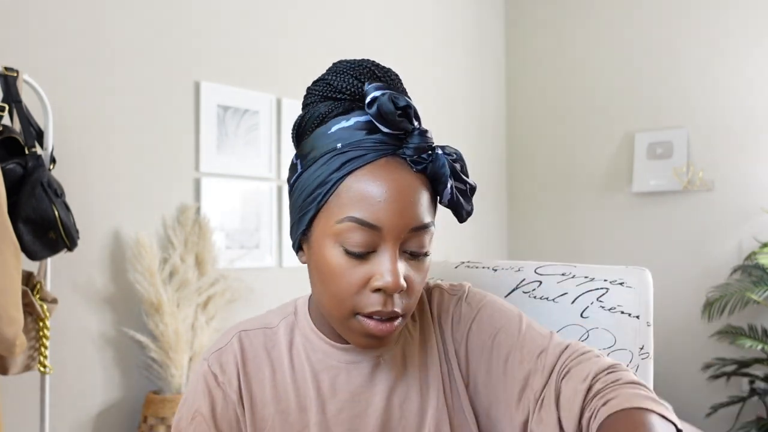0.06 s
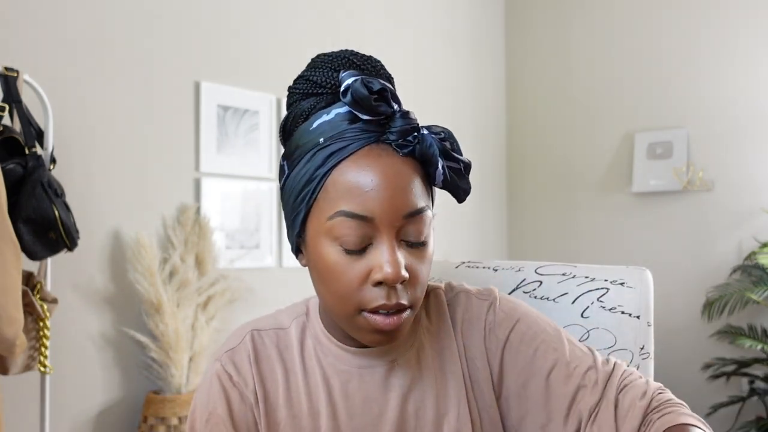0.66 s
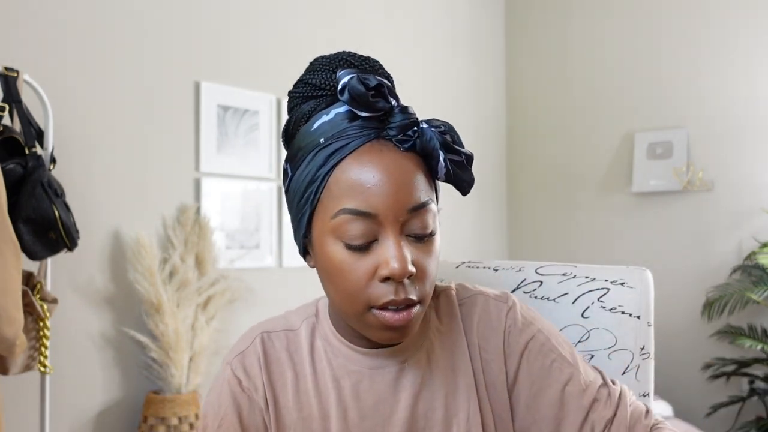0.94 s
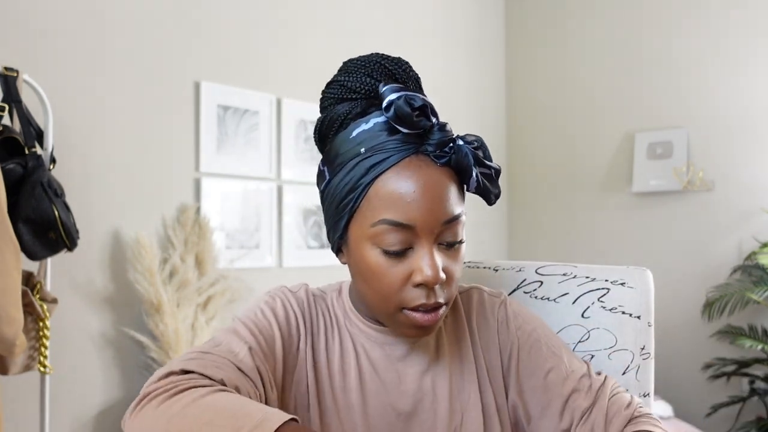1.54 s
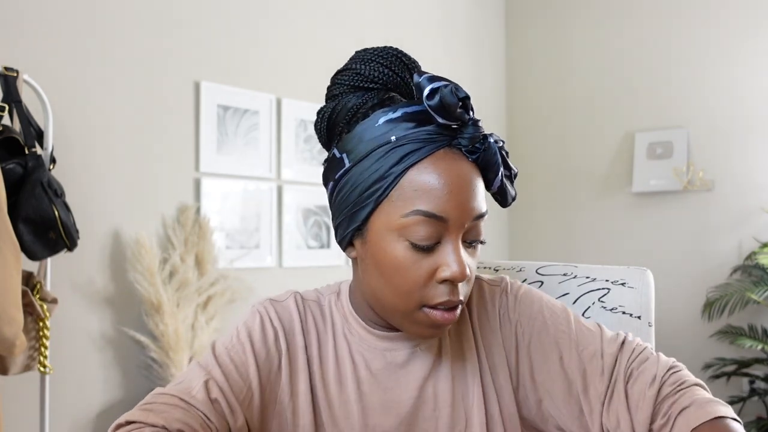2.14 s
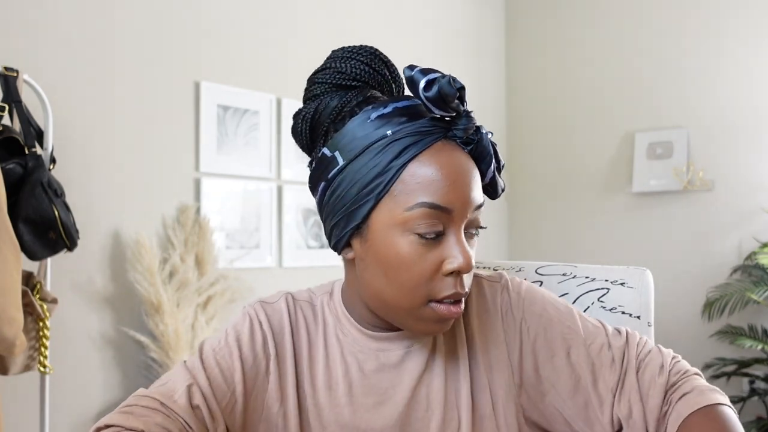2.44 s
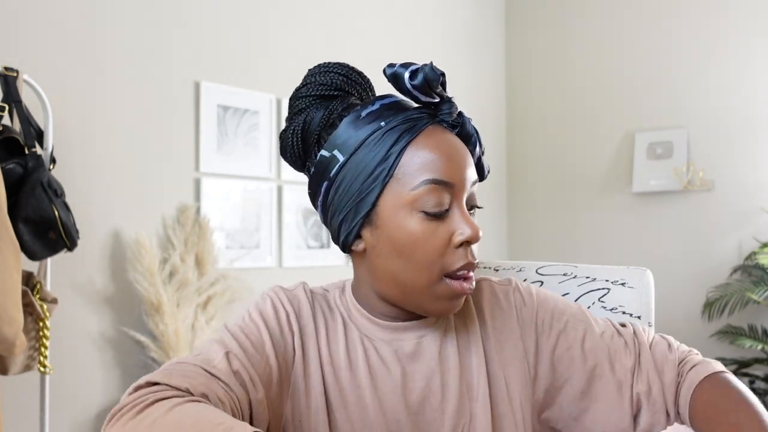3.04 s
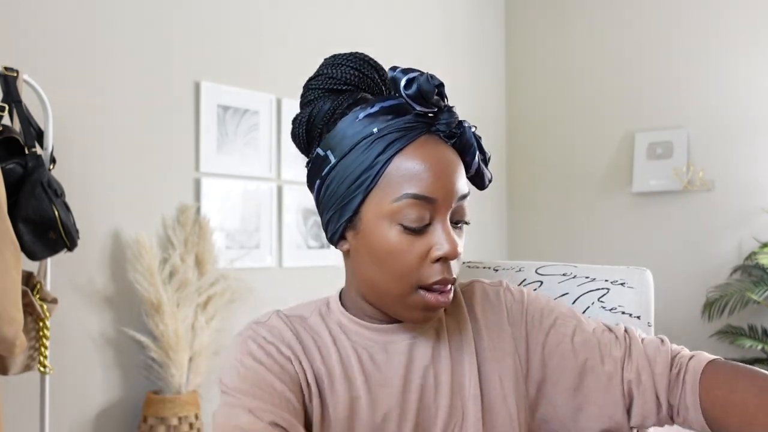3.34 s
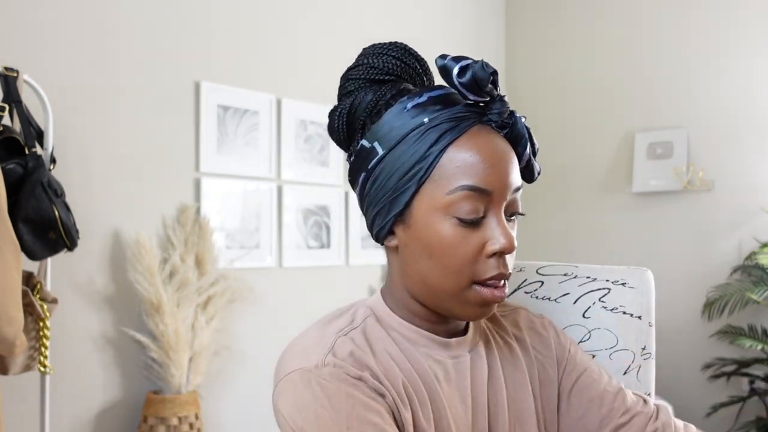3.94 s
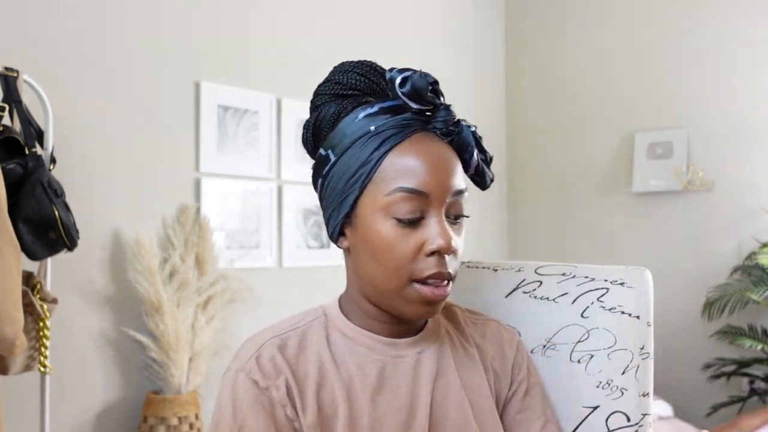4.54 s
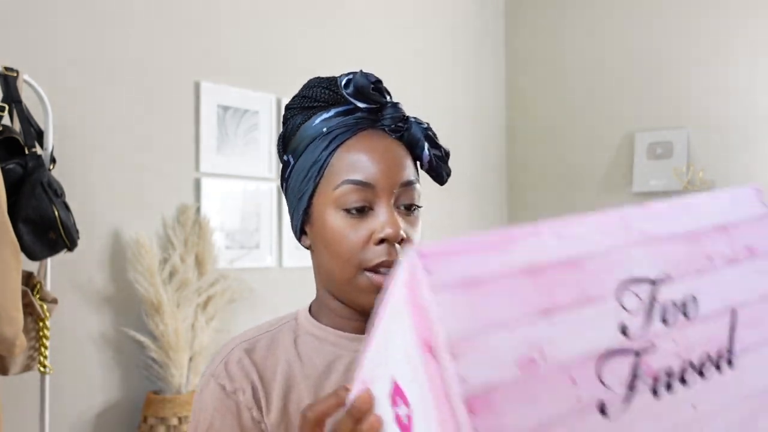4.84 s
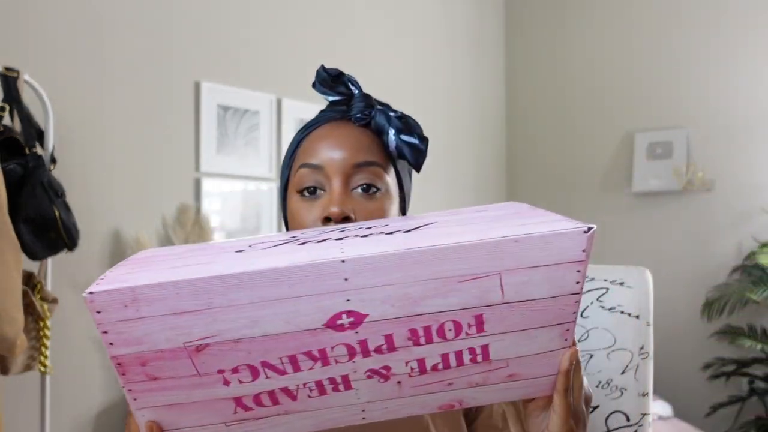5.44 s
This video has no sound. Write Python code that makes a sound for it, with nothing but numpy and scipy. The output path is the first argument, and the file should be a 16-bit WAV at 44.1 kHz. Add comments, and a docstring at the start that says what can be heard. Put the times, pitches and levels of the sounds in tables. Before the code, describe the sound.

A large cardboard package is opened at a desk in a small room, heard from close by. Hands and sleeves swish softly over the card while flaps give scattered light knocks. The box inside is then dragged free in short, scraping pulls, peaking in a loud, hollow judder with thumps. One more bump follows, then a few faint touches as it is lifted. A low room rumble lies underneath.

```python
"""A large cardboard package is opened at a desk in a small room, heard from close by.
First hands and sleeves brush the card with a swish of friction, and flaps knock, ringing its resonances.
From 2.3 s the box inside is dragged free in short pulls, and stick-slip motion drives a hollow judder,
loudest near 4 s. The box is bumped once more at 4.4 s and lifted, with a few last faint touches.
Throughout, the room reverberates and a low rumble lies under it all."""
import sys
import numpy as np
from scipy import signal
from scipy.fft import rfft, irfft, next_fast_len
from scipy.io import wavfile
from scipy.ndimage import uniform_filter1d, map_coordinates

SR = 44100
rng = np.random.default_rng(int(sys.argv[2]) if len(sys.argv) > 2 else 0)


def wav_record(signal):
    """Record a signal, one row per channel, as 16-bit PCM in the file named by sys.argv[1]."""
    frames = np.transpose(np.atleast_2d(signal))
    bounded = np.clip(frames, -1, 1)
    # unit amplitude maps onto the largest positive 16-bit level
    quanta = np.round(bounded * 32767).astype(np.int16)
    wavfile.write(sys.argv[1], SR, quanta)


N = 246462
TIME = np.arange(N) / SR


def amp(db):
    """The decibel scale: 20 dB is a tenfold amplitude."""
    return 10 ** (np.asarray(db) / 20)

def unit(x):
    """Power normalisation: scale to rms 1."""
    return x / np.sqrt(np.mean(x ** 2) + 1e-20)

def burst(x, size=256):
    """Short-time normalisation: the loudest few milliseconds have rms 1."""
    return x / np.sqrt(np.abs(uniform_filter1d(x ** 2, size)).max() + 1e-20)

def along(points, hz):
    """Interpolation of (frequency, value) points on a logarithmic frequency axis."""
    frequencies, values = np.transpose(points)
    return np.interp(np.log(hz + 1), np.log(frequencies + 1), values)

def envelope(points):
    """Interpolation of (time, level) points in decibels, giving one gain per sample."""
    return amp(np.interp(TIME, *np.transpose(points)))

def wobble(rate):
    """Random modulation: a smooth curve through rate knots a second."""
    return map_coordinates(rng.standard_normal(int(N * rate / SR) + 4), [TIME * rate])

def filtered(x, response):
    """Linear filtering: the spectrum of x is multiplied by a frequency response."""
    n = x.shape[-1]
    size = next_fast_len(n + 8192)
    return irfft(rfft(x, size) * response(np.fft.rfftfreq(size, 1 / SR)), size)[..., :n]

def equalised(x, spectrum):
    """Zero-phase filtering by (frequency, level) points."""
    return filtered(x, lambda hz: amp(along(spectrum, hz)))

def coloured(x, spectrum, size=2048):
    """Minimum-phase filtering: a folded cepstrum gives the causal filter with this spectrum."""
    cepstrum = irfft(np.log(amp(along(spectrum, np.fft.rfftfreq(size, 1 / SR)))))
    cepstrum[1:size // 2] *= 2
    cepstrum[size // 2 + 1:] = 0
    return signal.fftconvolve(x, irfft(np.exp(rfft(cepstrum))))[:len(x)]

def resonate(x, modes, skirt=2.27):
    """Modal superposition: damped resonances add with alternating sign, dark below and above them."""
    def response(hz):
        return sum((-1) ** k * amp(db) * 1j * hz * width / (centre ** 2 - hz ** 2 + 1j * hz * width)
                   for k, (centre, width, db) in enumerate(modes))
    band = signal.butter(2, [modes[0][0] / skirt, modes[-1][0] * skirt], 'band', fs=SR, output='sos')
    return signal.sosfilt(band, filtered(x, response))


def contact(t, t60, snap):
    """Impact excitation: a sudden push, then an exponentially dying chatter of card on card."""
    force = rng.standard_normal(len(t)) * amp(-60 * t / t60)
    force[0] += snap
    return force

# modes of the box's walls, its hollow and its stiff board: (frequency [Hz], bandwidth [Hz], level [dB])
WALL_MODES = [(102, 36, -10), (137.1, 22.6, -2.5), (182.6, 12.5, -1.5), (242, 40, -5)]
CAVITY_MODES = [(327.6, 30.6, 0), (395.5, 58, -1.5), (497, 143, -3.5), (656, 226, -5)]
BOARD_MODES = [(700, 92, -7.5), (854, 133, -2), (1108, 95, 0), (1230, 133, -1), (1433, 157, -1),
               (1786, 280, -4.5), (2520, 470, -9.5)]
# spectrum of the surface tick: (frequency [Hz], level [dB])
TICK_SPECTRUM = [(700, -44), (1800, -7), (2800, 7.5), (4200, 2), (6200, -3.5), (7500, -13), (10000, -8.5),
                 (15500, -32)]

def strike(hz, thump_db, hollow_db, clack_db, hardness, chatter, panel_t60=0.068, rise_s=0.00062):
    """Free vibration: one impact flexes a panel, rings the hollow and board, and ticks at the surface."""
    t = np.arange(SR // 3) / SR
    flex = np.sin(2 * np.pi * hz * t) * amp(-60 * t / panel_t60) * (1 - np.exp(-t / rise_s))
    # a panel radiates little below its own pitch
    flex = signal.sosfilt(signal.butter(3, 0.68 * hz, 'high', fs=SR, output='sos'), flex)
    walls = burst(resonate(contact(t, t60=0.0077, snap=4.3), WALL_MODES))
    thump = amp(thump_db - 1.5) * burst(burst(flex) + 0.41 * walls)
    cavity = resonate(contact(t, t60=0.72 * chatter, snap=6.8), CAVITY_MODES)
    hollow = amp(hollow_db - 6.5) * burst(cavity)
    # a blunt contact cannot reach the board's upper resonances, and hardly ticks
    reach_hz = min(1170 * 2 ** (2.77 * hardness), SR / 4)
    blunt = signal.butter(3, reach_hz, fs=SR, output='sos')
    board = resonate(contact(t, t60=chatter, snap=6), BOARD_MODES)
    clack = amp(clack_db - 6) * burst(signal.sosfilt(blunt, board))
    tick_db = clack_db - 32.5 + 35 * hardness
    tick = amp(tick_db) * burst(coloured(contact(t, t60=1.07 * chatter, snap=4), TICK_SPECTRUM))
    return thump + hollow + clack + tick

# edges and flaps striking the card, levels before each part's trim: (time [s], clack level [dB],
# panel pitch [Hz], thump re clack [dB], hollow re clack [dB], hardness [0-1], board chatter t60 [s])
FLAP_KNOCKS = [ (0.115, -38, 291, 1.5, 1, 0.48, 0.044), (0.406, -43, 320, -1, 5, 0.34, 0.12),
               (0.640, -32, 215, 11, -28, 0.25, 0.02), (1.122, -28, 380, -9, -3, 0.72, 0.12),
               (1.905, -48, 159, -12, 4.5, 0.82, 0.019), (2.019, -33.5, 232, 0, 1, 0.48, 0.034),
               (2.280, -43.5, 148, 2, 1.5, 0.64, 0.046), (2.329, -33, 225, 0, -14, 0.31, 0.067),
               (2.436, -33.5, 250, -4, 0, 0.15, 0.069), (2.48, -24, 142, -5.5, -27, 0.42, 0.013),
               (2.568, -28, 136, -9, -18, 0.24, 0.061), (2.615, -38.5, 170, 2, 8.5, .4, 0.055),
               (2.637, -30.5, 266, -4, -5.5, 0.69, 0.036), (3.110, -33, 344, 6, 1.5, .3, 0.037),
               (3.250, -22, 154, -1.5, 4.5, 0.37, 0.019), (3.621, -28, 356, -4.5, -7, 0.75, .033),
               (3.684, -31.5, 140, -2, -4, 0.69, 0.017), (3.755, -24, 192, 0, 4, 0.063, 0.036),
               (3.899, -26.5, 232, 5.5, -4, 0.5, 0.051), (3.922, -13, 168, 0, -7, 0.24, 0.0082),
               (3.942, -22, 254, 6, 3.5, 0.67, 0.091), (4.121, -40.5, 143, 8.5, 11, .2, 0.036),
               (4.379, -38, 190, 6, 15, .35, 0.028), (4.395, -23, 185, 3.5, 3.5, .3, 0.1),
               (4.408, -24.5, 161, 3.5, 4, 0.66, 0.072), (4.949, -51.5, 352, -15, 11, 0.36, .076),
               (5.153, -46, 266, -6, -1.5, 1, 0.0073), (5.287, -57.5, 354, 5, 19.5, 0.43, 0.044), ]
# dull bumps on the flat of a panel: (time [s], thump level before trim [dB], panel pitch [Hz])
PANEL_BUMPS = [(0.741, -30.5, 339), (0.775, -43, 338), (1.459, -33.5, 130), (1.496, -33, 135),
               (2.153, -31.5, 143.5), (3.270, -29.5, 294), (3.469, -32, 346), (3.604, -29.5, 143),
               (3.909, -14.5, 148), (3.954, -6.5, 154), (4.006, -12.5, 169), (4.027, -12.5, 149),
               (4.088, -26, 148), (4.350, -21, 211)]

def knocks():
    """Superposition of impacts: sharp knocks and dull bumps excite the modes of the same box."""
    hits = [(start, strike(hz, db + thump, db + hollow, db, hardness, chatter))
            for start, db, hz, thump, hollow, hardness, chatter in FLAP_KNOCKS]
    hits += [(start, strike(hz, db, hollow_db=db - 19, clack_db=db - 25, hardness=0.54, chatter=0.056))
             for start, db, hz in PANEL_BUMPS]
    out = np.zeros(N + SR)
    for start, hit in hits:
        out[round(start * SR):][:len(hit)] += hit
    return out[:N]


def grains(rate, spread_db, smooth):
    """Friction as shot noise: fibres catch and let go at random, rate times a second, over a rush."""
    catches = (rng.random(N) < rate / SR) * rng.standard_normal(N)
    catches *= amp(spread_db * np.minimum(rng.exponential(size=N), 4))
    return unit(unit(catches) + smooth * rng.standard_normal(N))

def push(start, rise, hold, release, sag_db=2.5, settle_db=-24, settle_t60=0.65):
    """Envelope of the driving force: it builds, eases while held and decays as the card slides on."""
    t = TIME - start
    sag = amp(-sag_db * np.clip((t - rise) / hold, 0, 1))
    after = np.maximum(t - rise - hold, 0)
    stop = np.maximum(amp(-60 * after / release), amp(settle_db - 60 * after / settle_t60))
    return np.clip(t / rise, 0, 1) * sag * stop

# card dragged over card, levels before each part's trim:
# (start [s], rise [s], hold [s], release t60 [s], judder [dB], groan [dB], scrape [dB])
PULLS = [ (2.334, 0.081, .25, 0.28, -41.5, -43, -42), (3.112, 0.038, 0.042, 0.24, -47, -37, -38.5),
         (3.744, 0.0056, 0.061, 0.14, -21.5, -23.5, -37.5), (3.896, 0.026, 0.095, 0.17, -13, -19, -26.5),
         (4.355, 0.044, 0.052, 0.18, -23, -28, -31), ]
# spectrum of tearing fibres: (frequency [Hz], level [dB])
GRIT_SPECTRUM = [(600, -30), (1800, -36), (2800, 2), (4500, -0.5), (8000, -4), (11000, -8.5), (15500, -12)]

def drags():
    """Stick-slip excitation: card catches on card, so the walls judder, hollow groans and board rasps."""
    judder, groan, scrape = sum(np.outer(amp(levels), push(start, rise, hold, release))
                                for start, rise, hold, release, *levels in PULLS)
    slips = grains(rate=900, spread_db=0, smooth=0.32)
    walls = amp(-7.5) * judder * unit(resonate(slips, WALL_MODES))
    hollow = amp(-6.5) * groan * unit(resonate(slips, CAVITY_MODES))
    rasp = amp(-6) * scrape * unit(resonate(slips, BOARD_MODES))
    # fibres tear and hiss mostly under a hard push
    tearing = unit(coloured(grains(rate=1500, spread_db=-1.5, smooth=1), GRIT_SPECTRUM))
    grit = amp(-8.5) * scrape * (scrape / scrape.max()) ** 0.24 * tearing
    return walls + hollow + rasp + grit


def swell(middle, length, edge_db=9, roundness=1.5):
    """Envelope of a sliding hand: level follows speed, down by edge_db at both ends of the stroke."""
    return amp(-edge_db * np.abs(2 * (TIME - middle) / length) ** roundness)

# moments when stick-slip settles on a pitch: (middle [s], duration [s], level [dB], pitch [Hz])
CREAK_TONES = [(1.782, 0.011, -43.5, 6000), (3.135, 0.061, -41.5, 385), (3.81, 0.049, -25.5, 350)]

def creaks(waver_share=0.0348, cycles_per_turn=8.2):
    """Periodic stick-slip: a fingertip squeaks on the gloss and a tight flap groans, in wavering tones."""
    out = np.zeros(N)
    for middle, length, db, hz in CREAK_TONES:
        pitch = hz * (1 + waver_share * wobble(hz / cycles_per_turn))
        tone = unit(np.sin(2 * np.pi * np.cumsum(pitch) / SR))
        out += amp(db) * swell(middle, length) * tone
    return out


# strokes of a hand over the card, levels before each part's trim:
# (middle [s], duration [s], swish level [dB], rub re swish [dB], hiss re swish [dB])
HAND_STROKES = [ (0.03, 0.26, -61, -23, 1.5), (0.29, 0.14, -55, -6, -12), (0.37, .16, -50.5, -6, -0.5),
                (0.642, 0.24, -51.5, 2.5, -1), (0.798, 0.19, -45.5, -5.5, -9.5), (1.06, 0.22, -57, -8, -7),
                (1.209, 0.2, -51.5, -0.5, -3.5), (1.42, 0.04, -62, 7, 10), (1.473, 0.067, -52.5, 1, 6),
                (1.57, .14, -53.5, 0, 5.5), (1.76, 0.21, -53.5, -20, 3.5), (1.92, 0.066, -63, -11, 16.5),
                (2.0, 0.15, -57, -1, 5), (2.16, 0.1, -52.5, -1, 5), (2.49, 0.085, -59.5, 8, -3),
                (2.65, 0.21, -56.5, 6, 4), (2.812, 0.077, -46.5, -5, -2.5), (2.89, .13, -48.5, -0.5, -3),
                (3.07, 0.21, -56, -3, 1), (3.18, .19, -48, 0, 1), (3.42, 0.34, -62.5, 6, 3.5),
                (3.60, .2, -55.5, 4, 11), (3.69, 0.094, -61.5, 15, -7), (3.80, 0.1, -57, -9, 7.5),
                (4.16, .14, -52.5, 1.5, 1), (4.551, .16, -57.5, -4, -4), (4.97, 0.081, -56.5, -5, -12),
                (5.06, 0.21, -58, -6, 0), (5.278, 0.065, -55.5, -2.5, -11), ]
# sleeves rustling as the arms move: (time [s], swish level before trim [dB])
SLEEVE_RUSTLE = [(0, -62.5), (1, -60.5), (2.3, -62.5), (3.4, -70), (4.3, -63), (4.75, -68.5), (5.2, -67.5),
                 (5.59, -80)]
# spectra of coarse, bright and fine friction: (frequency [Hz], level [dB])
RUB_SPECTRUM = [(100, -35), (300, 0), (500, 1.5), (850, 3.5), (1150, 2.5), (1700, -0.5), (2500, -1),
                (3600, -7.5), (8000, -52)]
SWISH_SPECTRUM = [(1200, -16), (2400, -10), (3000, 0), (3800, 2.1), (4700, -0.5), (6000, 0), (7200, -10),
                  (11000, -33)]
HISS_SPECTRUM = [(3000, -11.5), (5500, -2.5), (7200, -1), (9500, -1.5), (11500, -4.5), (15500, -3.5)]

def brushing():
    """Sliding friction: skin and cloth cross the card with uneven pressure, faintly drumming its walls."""
    hands = [np.outer(amp([db + rub_db, db, db + hiss_db]), swell(middle, length))
             for middle, length, db, rub_db, hiss_db in HAND_STROKES]
    sleeves = np.outer(amp([1, 0, 0]), envelope(SLEEVE_RUSTLE))
    # incoherent sources add in power
    rub, swish, hiss = np.sqrt(sleeves ** 2 + sum(hand ** 2 for hand in hands))
    pressure = amp(1.9 * wobble(35))
    coarse = rub * unit(coloured(grains(rate=2500, spread_db=5.5, smooth=1.46), RUB_SPECTRUM))
    bright = amp(-2) * swish * unit(coloured(grains(rate=2700, spread_db=5, smooth=1.6), SWISH_SPECTRUM))
    fine = amp(0.35) * hiss * unit(coloured(grains(rate=2200, spread_db=1, smooth=1.45), HISS_SPECTRUM))
    drum = amp(3) * rub * unit(resonate(grains(rate=200, spread_db=4, smooth=1), WALL_MODES))
    friction = pressure * (coarse + bright + fine)
    # comb filtering: the card reflects the sound over a path that changes as the hand moves
    delay_s = 0.000596 * amp(3.02 * wobble(3))
    reflection = 0.19 * np.interp(TIME - delay_s, TIME, friction)
    return 0.92 * (friction + reflection) + drum


# where the hands work: (time [s], left minus right at full lean [dB])
HAND_BALANCE = [(0.0, -0.5), (0.7, -2), (1.0, -.6), (1.55, -1), (2.05, -3), (2.97, -0.4), (3.64, -3.5),
                (4.1, -1.8), (4.35, -6), (4.7, 1), (5.59, -1)]
# how much of that lean each frequency keeps: (frequency [Hz], share [0-1])
LEAN_SHARE = [(150, 0.056), (500, 0.47), (1500, 0.84), (5000, 0.73), (12000, 0.6)]

def lean(x):
    """Localisation by level difference: a side signal puts the package mostly a little to the right."""
    ratio = envelope(HAND_BALANCE)
    return filtered(x * (ratio - 1) / (ratio + 1), lambda hz: along(LEAN_SHARE, hz))

# spectrum of the desk's glancing echo: (frequency [Hz], level [dB])
DESK_SPECTRUM = [(300, -33), (900, -28), (2000, -12), (4500, -25), (12000, -22)]

def desk_echo(x, delay_s=0.0031):
    """Early reflection: the desk returns a faint, coloured and delayed copy."""
    return filtered(x, lambda hz: amp(along(DESK_SPECTRUM, hz)) * np.exp(-2j * np.pi * hz * delay_s))

# strength of the room's answer: (frequency [Hz], level [dB])
REVERB_SPECTRUM = [(150, -2), (1500, -4.5), (5000, -10.5), (12000, -11.5)]
# reverberation time: (frequency [Hz], t60 [s])
REVERB_TIMES = [(100, 0.35), (300, 0.45), (1200, 0.33), (4000, 0.51), (14000, 0.34)]

def reverberation(x, stretches=32):
    """Diffuse reflection: the walls answer each stretch anew as the box moves; the bass stays central."""
    x = equalised(x, REVERB_SPECTRUM)
    hop_s = N / SR / stretches
    wet = np.zeros((2, N + SR))
    for k in range(stretches + 1):
        share = np.clip(1 - np.abs(TIME / hop_s - k), 0, 1)
        live = np.flatnonzero(share)
        hz, age, noise = signal.stft(rng.standard_normal((2, SR // 2)), SR, nperseg=256)
        decay = amp(-60 * age / along(REVERB_TIMES, hz)[:, None])
        tail = signal.istft(noise * decay, SR, nperseg=256)[1]
        tail[:, :SR // 300] = 0  # silence until the first reflection
        stretch = x[live] * np.sqrt(share[live])
        answer = signal.fftconvolve(stretch[None], tail / np.linalg.norm(tail[0]), axes=1)
        wet[:, live[0]:live[0] + answer.shape[1]] += answer
    mid, side = wet[:, :N]
    side = equalised(side, [(120, -54), (300, -29), (700, -10.5), (2000, -13), (4500, -24.5), (12000, -37)])
    return np.array([mid + side, mid - side])

# low modes of the room: (frequency [Hz], bandwidth [Hz], level [dB])
ROOM_MODES = [(50, 2, 20), (96.4, 0.82, 0), (133, 18, -1)]

def standing_waves(x):
    """Room resonance: standing waves ring on at a few low frequencies."""
    return resonate(x, ROOM_MODES)

# spectrum of the room's background: (frequency [Hz], relative level [dB])
RUMBLE_SPECTRUM = [(20, -24), (45, -9.5), (80, -8), (130, 2.5), (200, -1.5), (280, 0), (370, 0),
                   (470, -13.5), (700, -14.5), (1400, -25.5), (2800, -28), (5000, -36), (10000, -38.5),
                   (15500, -61)]

def room_tone():
    """Stationary noise: a low rumble and faint hiss, almost alike in both channels."""
    mid, side = (unit(equalised(noise, RUMBLE_SPECTRUM)) for noise in rng.standard_normal((2, N)))
    side = equalised(side, [(100, -15), (500, -9), (1500, 0), (4000, -8), (10000, -14)])
    return amp(-50.5) * np.array([mid + side, mid - side])


def scene():
    """Superposition: direct sound, the room's response and its rumble add in two channels."""
    box = knocks() + drags() + creaks()
    direct = box + brushing()
    in_room = direct + reverberation(direct) + standing_waves(direct)
    side = lean(in_room) + desk_echo(box)  # heard only as a difference between the channels
    return in_room + side * np.array([[1], [-1]]) + room_tone()

def record(dry, low_cut_hz=62, top_hz=15850):
    """Band limiting: a second-order high-pass thins the deep bass, and nothing passes above top_hz."""
    return filtered(dry, lambda hz: (hz < top_hz) * hz ** 2 / np.sqrt(hz ** 4 + low_cut_hz ** 4))


dry = scene()
out = record(dry)
wav_record(out)
```